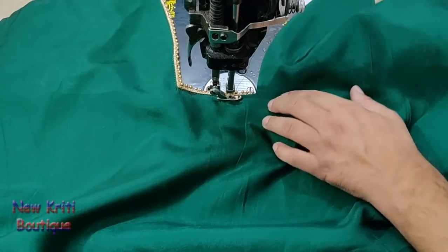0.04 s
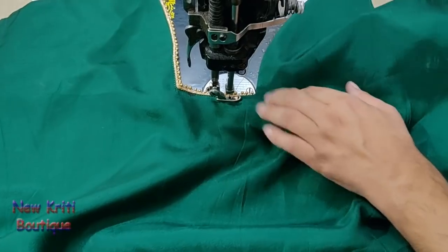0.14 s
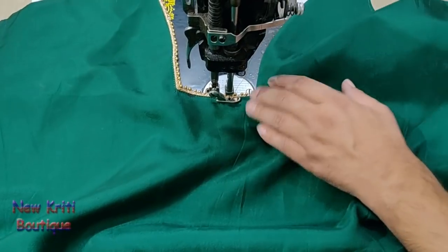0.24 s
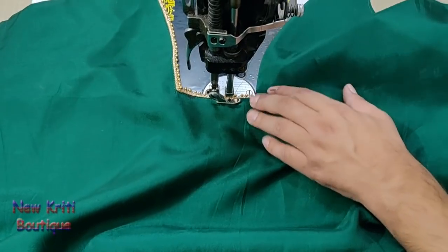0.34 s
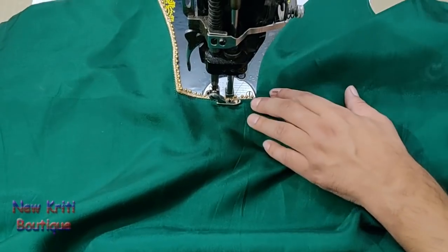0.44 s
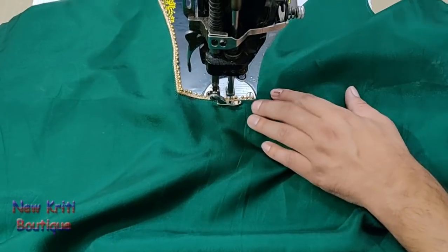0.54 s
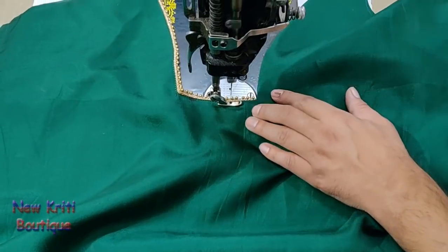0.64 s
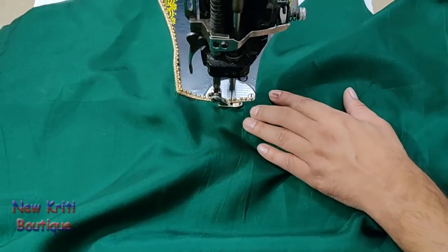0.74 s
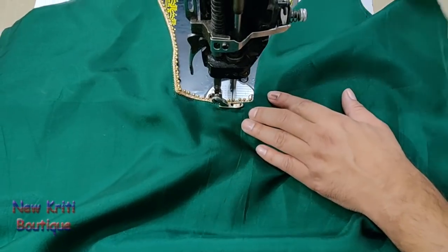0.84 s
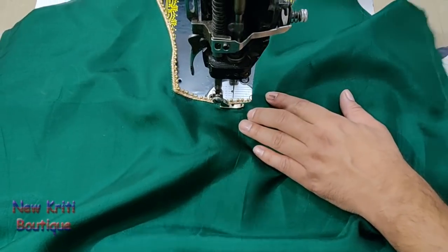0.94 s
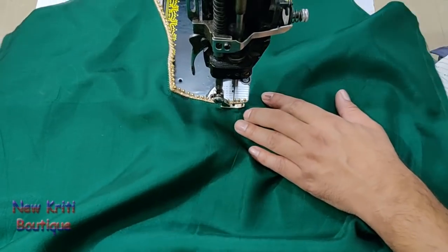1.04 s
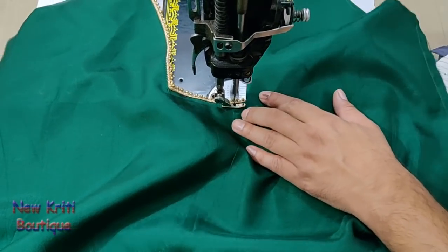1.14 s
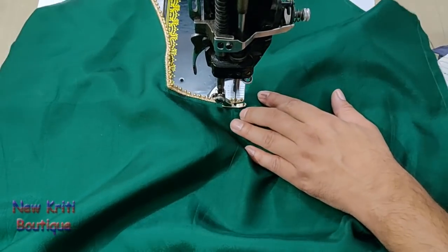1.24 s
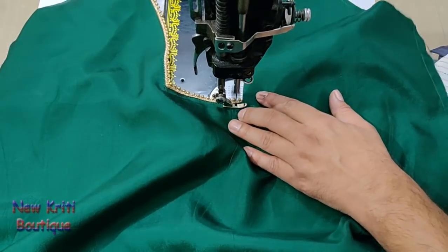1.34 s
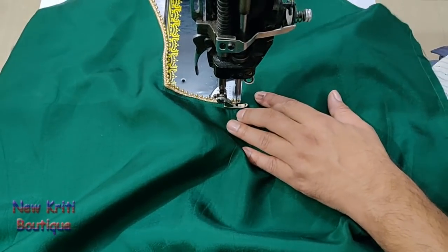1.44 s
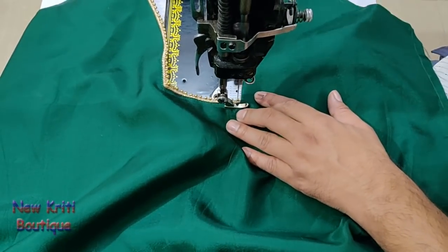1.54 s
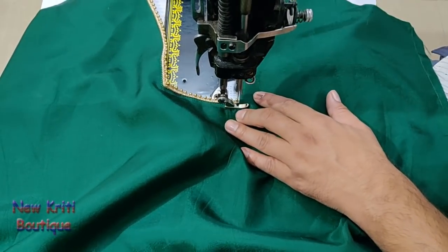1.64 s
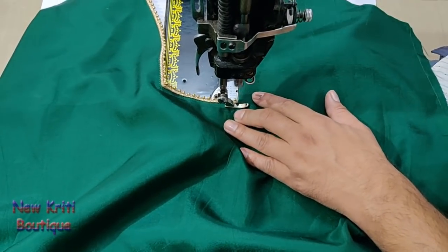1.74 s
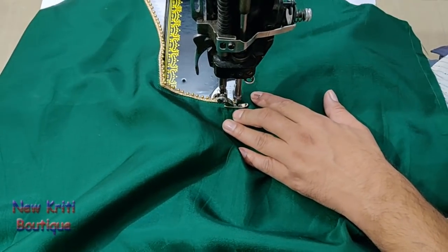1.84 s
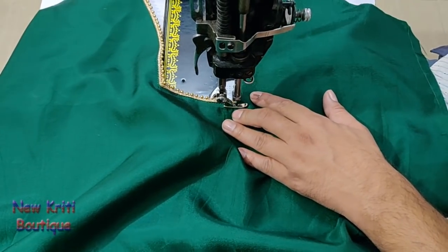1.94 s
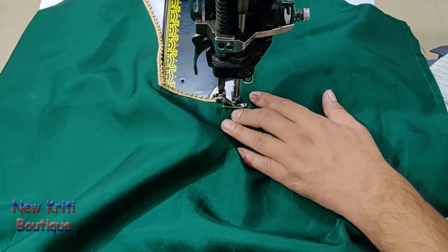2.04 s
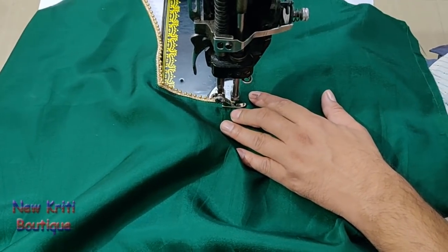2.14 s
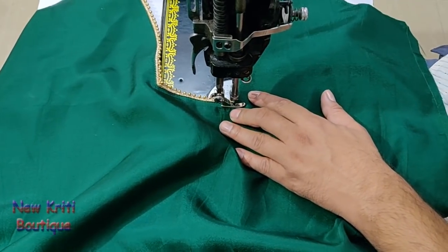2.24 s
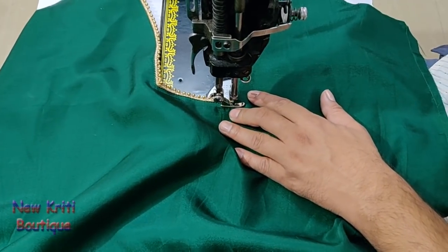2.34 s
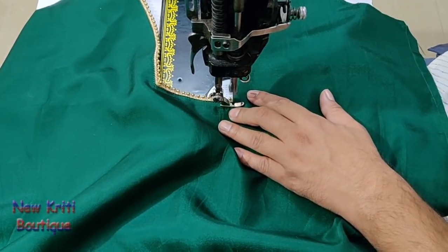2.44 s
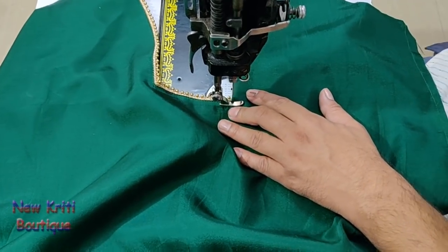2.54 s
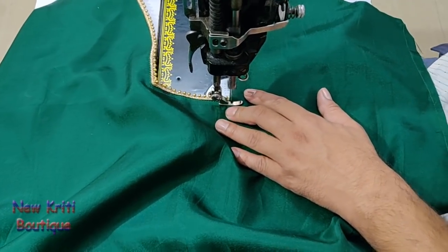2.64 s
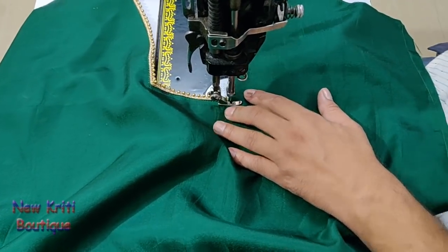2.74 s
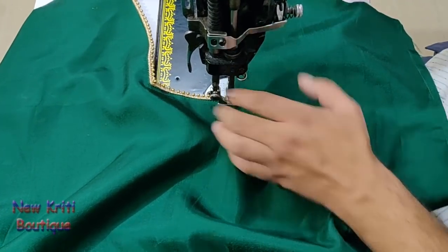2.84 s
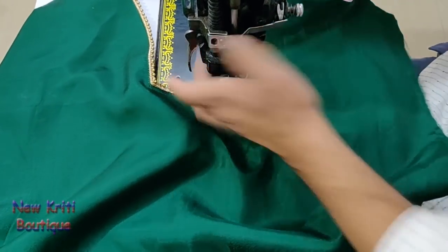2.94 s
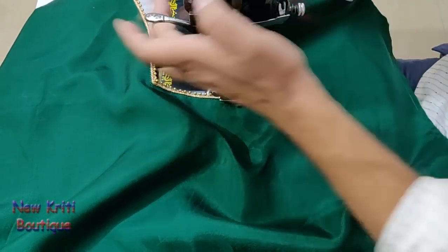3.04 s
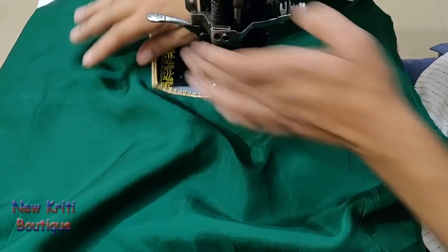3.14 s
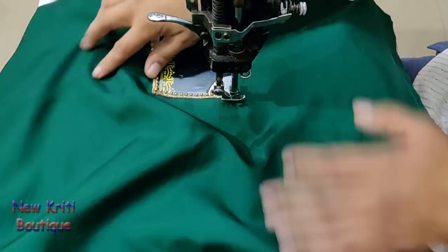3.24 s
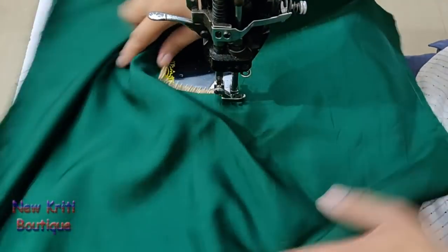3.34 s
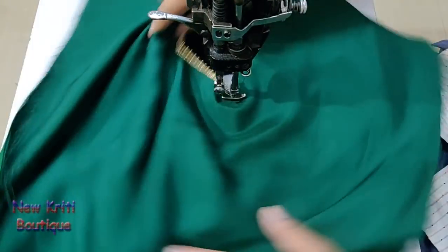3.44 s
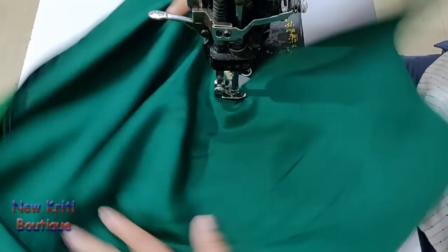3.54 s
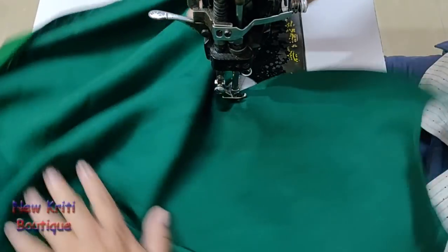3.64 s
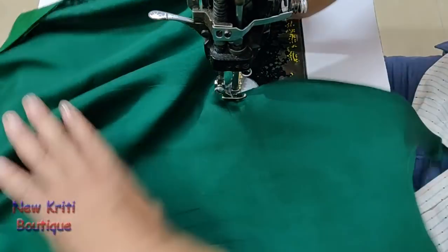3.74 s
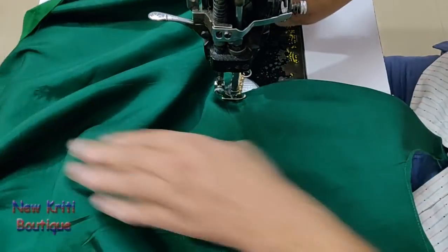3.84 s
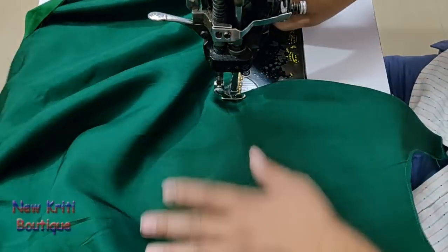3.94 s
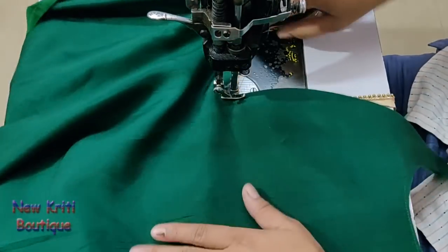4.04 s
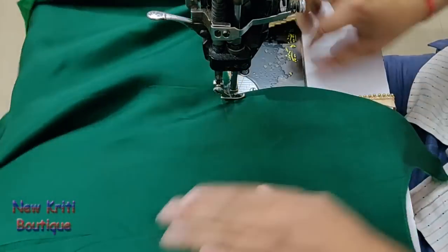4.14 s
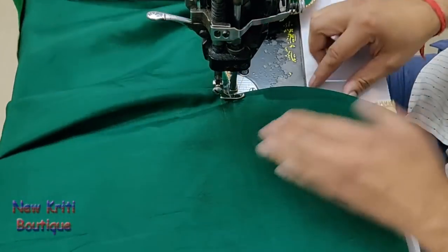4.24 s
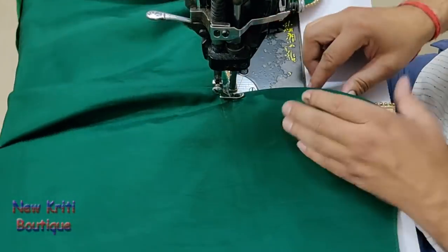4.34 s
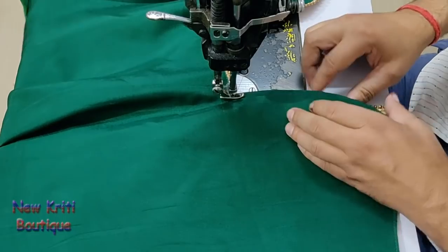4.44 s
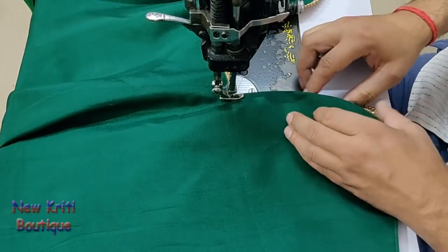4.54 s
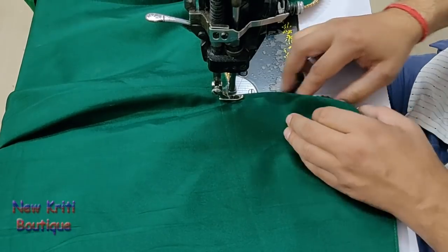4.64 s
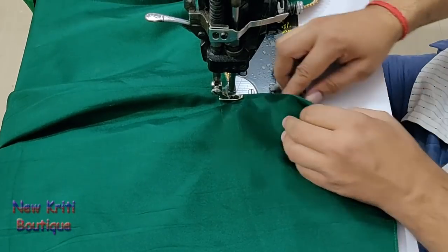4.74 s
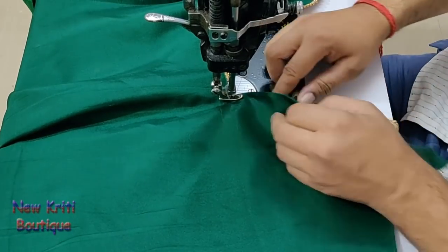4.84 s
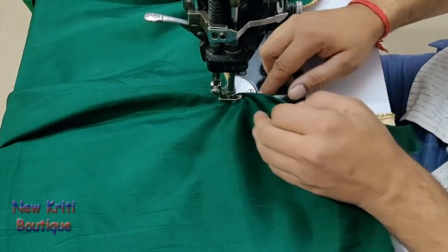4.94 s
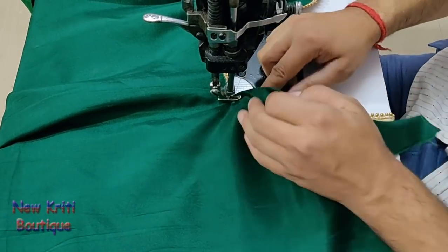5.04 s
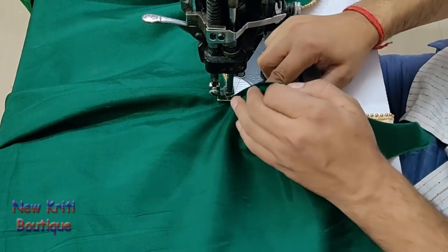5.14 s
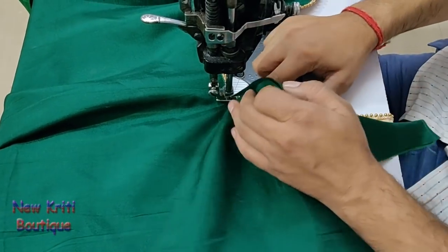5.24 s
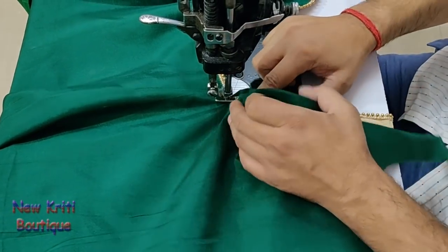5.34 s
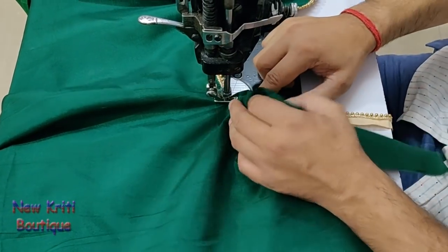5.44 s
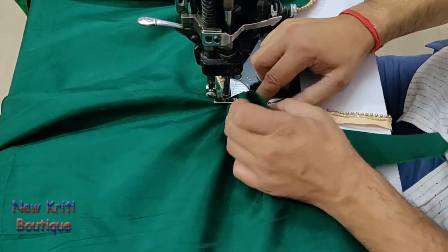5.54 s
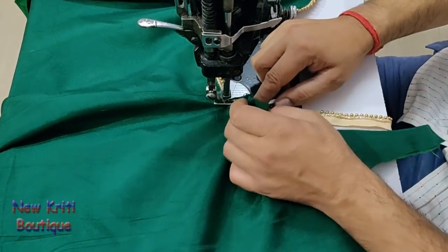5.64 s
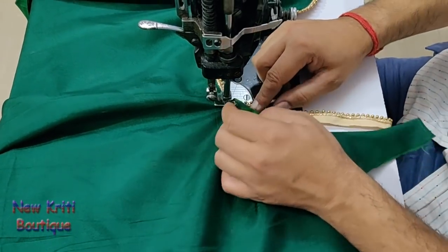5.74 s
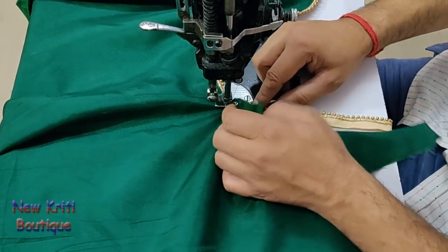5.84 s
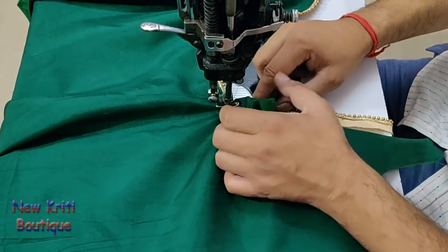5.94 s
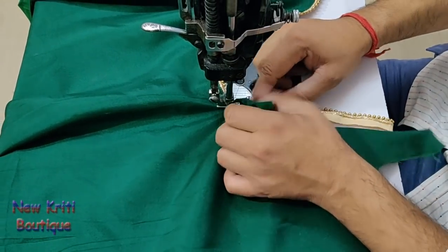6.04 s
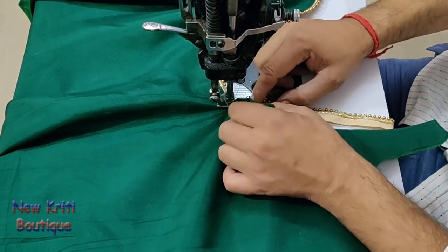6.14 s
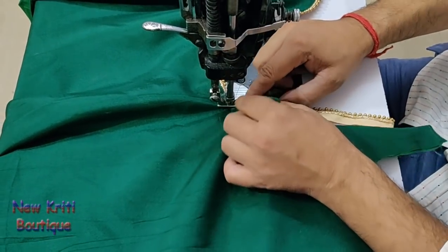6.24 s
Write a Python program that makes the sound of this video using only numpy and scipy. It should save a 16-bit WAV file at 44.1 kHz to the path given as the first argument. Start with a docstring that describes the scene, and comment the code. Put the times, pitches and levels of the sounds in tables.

```python
"""Over faint air a switch ticks and a cast-iron sewing machine starts up on a wooden table: gears hiss, a motor whines.
It sews a short run, coasts to a stop and is turned on a little by hand; the presser lever snaps up, hands knock the
table and drag the cloth round. Blows and ticks set modes of wood and iron ringing; hiss, cloth and air are shaped
noise; whine, squeaks and hums are narrow noise. A small room answers, heard by a close pair of microphones."""
import sys
import numpy as np
from scipy import signal
from scipy.fft import rfft, irfft, next_fast_len
from scipy.io import wavfile
from scipy.ndimage import uniform_filter1d

SR = 44100
rng = np.random.default_rng(int(sys.argv[2]) if len(sys.argv) > 2 else 0)


def to_wav(s):
    """Save 16-bit WAV."""
    ch = np.atleast_2d(s).T  # columns
    pcm = np.round(np.clip(ch, -1, 1) * 32767)  # PCM
    wavfile.write(sys.argv[1], SR, pcm.astype(np.int16))


N = 276991


def from_db(db):
    """Decibels to gain."""
    return 10 ** (np.asarray(db) / 20)


def rms_one(x):
    """Scale to rms 1."""
    return x / np.sqrt(np.mean(x ** 2) + 1e-20)


def in_time(rows):
    """Columns joined by straight lines; -120 outside the table."""
    seconds, *columns = np.transpose(rows)
    return [np.interp(np.arange(N) / SR, seconds, c, left=-120, right=-120) for c in columns]


def at_hz(points, hz, axis=1):
    """Read a column on a log-frequency axis."""
    points = np.array(points)
    return np.interp(np.log(hz), np.log(points[:, 0]), points[:, axis])


def swell(peak_s, rise_s, fall_s, db):
    """Gain that climbs 10 dB per rise time to its peak and sinks 10 dB per fall time."""
    t = np.arange(N) / SR - peak_s
    return from_db(db - 10 * np.maximum(-t / rise_s, t / fall_s))


def drift(rate_hz):
    """Slow random wander, rms about 1, made at a fortieth of the sample rate."""
    r = np.exp(-80 * np.pi * rate_hz / SR)
    noise = rng.standard_normal(N // 40 + 2002)
    slow = signal.lfilter([1], [1, -2 * r, r * r], noise)[2000:]
    return np.interp(np.arange(N) / 40, np.arange(len(slow)), rms_one(slow))


def coloured(x, gain):
    """Apply a gain given as a function of frequency."""
    size = next_fast_len(N + SR // 4)
    hz = np.maximum(np.fft.rfftfreq(size, 1 / SR), 10)
    return irfft(rfft(x, size) * gain(hz), size)[..., :N]


def spread_noise(spectrum, width, patchy_db):
    """Coloured stereo noise, narrow in the bass and wide in the treble, flickering a little; rms 1."""
    mid, side = coloured(rng.standard_normal((2, N)), lambda hz: from_db(at_hz(spectrum, hz)))
    side = coloured(side, lambda hz: from_db(at_hz(width, hz)))
    return rms_one((mid + side * [[1], [-1]]) * from_db(patchy_db * drift(8.4)))


def grains(per_s, spread_db):
    """Random little contacts of uneven size; rms 1."""
    spread = np.minimum(rng.exponential(1, N), 5)
    sizes = from_db(spread_db * spread) * rng.choice([-1, 1], N)
    return rms_one(sizes * (rng.random(N) < per_s / SR))


def ring(clicks, hz, t60):
    """A damped resonator: a unit click sets a sine of height 1 ringing."""
    r, w = from_db(-60 / (t60 * SR)), 2 * np.pi * hz / SR
    return signal.lfilter([0, np.sin(w)], [1, -2 * r * np.cos(w), r * r], clicks + 1e-18)


# Colour of the room and recorder noise. Each row: frequency in Hz, relative level in dB.
AIR_COLOUR = [(15, -53), (25, -7), (76, -6.5), (111, -1), (280, -6.5), (358, -9.5), (538, -12), (787, -20),
              (854, -15), (927, -20.5), (3320, -30), (15200, -31.5), (16500, -26.5)]
# Stereo width of air and rustle. Each row: frequency in Hz, side minus mid in dB.
FAR_SIDE = [(60, -7), (180, -7.5), (550, -2.5), (1650, 0.5), (4970, -0.5), (15000, 0)]
AIR_DB = -57


def air():
    """Room and recorder noise, a steady wide bed of coloured noise."""
    return from_db(AIR_DB) * spread_noise(AIR_COLOUR, FAR_SIDE, patchy_db=.8)


# The shaft turned by motor, then by hand: two lists. Each row: time in seconds, hiss of the gear in dB.
RUNNING = [
    [(.322, -47), (.335, -41.5), (.38, -42), (.43, -40), (.52, -38), (.64, -35.5), (.94, -34), (1.09, -37),
     (1.27, -40.5), (1.43, -43), (1.53, -43), (1.68, -57.5), (1.8, -84)],
    [(2.15, -83.5), (2.25, -61), (2.33, -52), (2.4, -56.5), (2.5, -59.5), (2.58, -70), (2.68, -89)],
]
FULL_HISS_DB = -37   # hiss at full speed


def shaft(db=FULL_HISS_DB, follows=1):
    """Gain tied to the turning shaft: db at full-speed hiss, then this many dB per dB of hiss."""
    return sum(from_db(db + follows * (in_time(part)[0] - FULL_HISS_DB)) for part in RUNNING)


# Single ticks of switch, handwheel, lever and pins, with a faint noisy swell just before the lever's clack.
# Each row: start in seconds, level in dB, balance of the mids in dB, balance of the top in dB.
TICKS = [(0.3169, -50, 13, -6), (0.3256, -34, -13, -24), (1.946, -61, 7, 10), (1.9585, -41.5, -9.5, -25),
         (2.1564, -50, -12, -21), (2.186, -46, -15, -10), (2.3135, -17.5, -17.5, -15),
         (2.3304, -19, -13, -10.5), (2.383, -24.5, -13, -15), (2.429, -49, 10, -21), (2.481, -47, 7, -22),
         (2.5059, -39, -17, -22), (2.533, -50, 2, -16), (2.79, -58.5, 19.5, 23), (2.8035, -6.5, -9, -5),
         (2.815, -23, -5, -6), (2.827, -21, -15, -9), (2.8371, -4, -11.5, -5), (2.849, -16.5, -7.5, -8),
         (2.864, -22, -8, -8.5), (2.882, -21, -3, -6), (3.021, -37, -60, -8), (3.7953, -36, 4, -28),
         (4, -39.5, -2.5, -26), (4.114, -23.5, -39, -1.5), (4.2137, -40, -11, 2), (4.37, -45.5, -33.5, 5),
         (4.6235, -39, -18, 1), (4.731, -42, -12, 1), (5.0015, -62, 1.5, -9), (5.038, -46.5, -16, -9.5)]
# Steel contacts of take-up, feed and hook as the shaft turns.
# Each row: start in seconds, level in dB, balance of the mids in dB, balance of the top in dB.
CLICKS = [(0.4464, -19, -16, -14), (0.4918, -22, -15, -16), (0.5457, -17.5, -16, -13),
          (0.5624, -17, -13, -16), (0.6245, -15, -17, -16), (0.6549, -14, -20, -14),
          (0.7133, -19.5, -14, -16), (0.7387, -15, -9, -18), (0.7692, -21, -9, -16),
          (0.7861, -17, -15, -16), (0.8101, -20, -11, -27), (0.8435, -20, -7, -18), (0.8584, -15, -18, -10),
          (0.8854, -38, -13, -14), (0.9218, -19, -13, -20), (0.9363, -16, -23, -13), (0.9652, -24, -8, -16),
          (1.0061, -17.5, -15, -16), (1.0231, -14, -17, -13), (1.0535, -16, -13, -16),
          (1.0715, -21, -13, -16), (1.0984, -20.5, -12, -16), (1.1199, -16, -27, -9),
          (1.1533, -15.5, -9, -13), (1.1744, -33, -13, -16), (1.2082, -19.5, -13, -14),
          (1.2326, -14.5, -13, -14), (1.2744, -29, -1, -16), (1.2979, -21.5, -15, -21),
          (1.3438, -16.5, -20, -12), (1.3658, -19.5, -14, -15), (1.4187, -19.5, -10.5, -11),
          (1.4451, -34, -9, -14), (1.5179, -17, -19, -13), (1.5529, -21.5, -5.5, -10),
          (1.6457, -23.5, -15.5, -12)]
TICK_PAN_DB, CLICK_PAN_DB = 1.5, 2     # left minus right
PLATE_DB, CLICK_RING_DB = -4, -28      # plates ring: against a tick's mids, fixed for a click


def all_ticks():
    """The contacts of the turning shaft, then the single ticks, each with its pan and ring level."""
    contacts = [(*row, CLICK_PAN_DB, CLICK_RING_DB) for row in CLICKS]
    singles = [(s, db, mids_db, top_db, TICK_PAN_DB, mids_db + PLATE_DB) for s, db, mids_db, top_db in TICKS]
    return np.transpose(contacts + singles)


# Iron arm and plates. Each row: mode in Hz, level in dB, 60 dB decay in seconds,
# dB more with a hand on the wheel, further dB once the lever is lifted.
IRON_MODES = [(1045, -16, 0.13, 9, -1.5), (1137, -21.5, .1, 5, 5.5), (1307, -20, 0.13, -4, 3),
              (1392, -15, 0.23, -2, 9), (1651, -17, 0.25, 3, -9), (1898, -21.5, 0.11, -1, 7),
              (1997, -13.5, 0.42, -11, -5), (2290, -21, .15, -5, 4), (6600, 0.5, 0.03, -4.5, 0)]
# Colour of the crack of a tick. Each row: frequency in Hz, relative level in dB.
CRACK_COLOUR = [(470, -28), (800, 7.5), (2070, 1), (3390, -3.5), (3660, 0), (4100, -4.5), (4480, 2.5),
                (5410, -3), (6710, 3.5), (11000, -21), (13600, -14), (15100, -12), (16500, -38)]
# Rattle of the lower iron modes, on the scale of their levels: dB at full speed, dB per dB of hiss.
IRON_SHAKE = (-28.5, 0.84)
CRACK_S, RATTLE_S, RATTLE_DB = 0.0018, 0.032, -24   # times to fall to a third; loose parts rattle under the crack
TOP_PAN_DB = -5.5           # added to the left-right lean above 9.5 kHz
TOP_RING_DB = -17           # the highest mode against the tick level, before its own level
HAND_ON_S, LIFTED_S = 2.1, 2.7
SHAKE_T60_S = 0.037         # parts in touch ring only briefly


def iron():
    """Each tick is a brief broad crack with a rattle, its noise different at each microphone, and a faint ring."""
    s, level_db, mids_db, top_db, pan_db, ring_db = all_ticks()
    at, cracked = (s * SR).astype(int), np.zeros((2, N))
    t = np.arange(3000) / SR
    crack = (1 - np.exp(-t / 0.001)) * np.exp(-t / CRACK_S)
    rattle = from_db(RATTLE_DB) * np.exp(-t / RATTLE_S)
    puffs = rng.standard_normal((len(at), 2, len(t))) * (crack + rattle)
    splits = [(3000, "low", mids_db + 10.5, 0),
              ([3000, 9500], "band", 0, 0),
              (9500, "high", top_db + 14.5, TOP_PAN_DB)]
    for edge_hz, kind, balance_db, lean_db in splits:
        band = np.zeros((2, N))
        gain = from_db(level_db + balance_db + (pan_db + lean_db) * [[.5], [-.5]])
        for i, start in enumerate(at):
            band[:, start:start + len(t)] += gain[:, [i]] * puffs[i]
        cracked += signal.sosfilt(signal.butter(3, edge_hz, kind, fs=SR, output="sos"), band + 1e-18)
    cracked = coloured(cracked, lambda hz: from_db(at_hz(CRACK_COLOUR, hz) + 5))

    rings, luck_db = 0, rng.normal(0, 2.5, (len(at), len(IRON_MODES)))
    shaken = shaft(*IRON_SHAKE)
    for k, (hz, mode_db, t60, held_db, lifted_db) in enumerate(IRON_MODES):
        lower = hz < 3000
        if lower:   # the turning shaft keeps these rattling
            cracked += from_db(mode_db) * shaken * rms_one(ring(grains(250, 5.3), hz, SHAKE_T60_S))
        strike_db = level_db + (ring_db if lower else TOP_RING_DB) + mode_db + luck_db[:, k]
        strike_db = strike_db + held_db * (s > HAND_ON_S) + lifted_db * (s > LIFTED_S)
        clicks = np.zeros(N)
        clicks[at] += from_db(strike_db)
        rings = rings + ring(clicks, hz, t60)
    return cracked, rings


def narrow_hiss(hz, gain, orders, width_hz):
    """Narrow bands of noise on multiples of a pitch curve: slow noise on a sine and a cosine."""
    turns = np.cumsum(hz) / SR
    tone = 0
    for multiple, db in orders:
        angle = 2 * np.pi * multiple * turns
        wander_hz = multiple * width_hz
        tone = tone + from_db(db) * (drift(wander_hz) * np.sin(angle) + drift(wander_hz) * np.cos(angle))
    return gain * tone


# Short rubs, squeaks and one low hum. Each row: peak in seconds, rise in seconds, fall in seconds,
# level in dB, pitch in Hz, glide in Hz per second, width in Hz.
SQUEAKS = [(.319, 0.0026, 0.0053, -40, 1915, 4, 150), (2.482, 0.007, 0.012, -53.5, 2145, 1.5, 100),
           (3.68, 0.086, 0.12, -53, 125.5, -2, 4.1), (4.069, 0.05, 0.14, -53, 2230, 120.5, 90),
           (4.118, 0.29, 0.056, -52.5, 801, 99.5, 36), (4.51, 0.023, 0.03, -66, 2470, -4, 19),
           (4.765, 0.038, 0.018, -61, 1745, 3, 140), (5.14, .05, 0.071, -69.5, 1640, -0.5, 31),
           (5.5, 0.055, 0.036, -67, 2630, 3.5, 79)]
# Hums in the table once the motor is on. Each row: peak in seconds, rise in seconds, fall in seconds,
# level in dB, pitch in Hz, glide in Hz per second, width in Hz.
HUMS = [(.64, 0.15, 0.13, -29.5, 437.4, -4.5, 13.5), (1.13, 0.18, 0.063, -26.5, 432, 251.5, 12)]


def squeaks(rows):
    """Each narrow hiss swells and sinks on its own gliding pitch."""
    t = np.arange(N) / SR
    return sum(narrow_hiss(hz + glide * (t - s), swell(s, rise, fall, db), [(1, 0)], width_hz)
               for s, rise, fall, db, hz, glide, width_hz in rows)


# Colour of the running gear. Each row: frequency in Hz, relative level in dB.
GEAR_COLOUR = [(1530, -19.5), (2600, -7.5), (5300, -10.5), (6730, -7), (7380, -12), (10300, -19.5),
               (11200, -26), (15000, -16), (16000, -25), (16500, -53)]
# Stereo width of the machine's sound. Each row: frequency in Hz, side minus mid in dB.
NEAR_SIDE = [(60, -35), (150, -35), (380, -24.5), (950, -3.5), (2380, -1), (5980, 1), (15000, -1.5)]


def gear():
    """Bearings, belt and thread hiss in a gritty stream while the shaft turns."""
    grit = 1 + 0.2 * uniform_filter1d(np.abs(grains(300, 8.3)), size=40)
    return shaft() * grit * spread_noise(GEAR_COLOUR, NEAR_SIDE, patchy_db=2)


# Swell of the motor whine: peak in seconds, rise in seconds, fall in seconds, level in dB.
WHINE_SWELL = (.61, .4, .06, -37.5)
# Partials of the whine. Each row: multiple of the pitch, level in dB.
WHINE_ORDERS = [(1, -6), (2, -3), (3, -11), (4, -14), (6, -11)]
MOTOR_ON_S, TOP_HZ, START_HZ, SPIN_UP_S = .33, 1575, 475, .185   # the pitch closes in on its top
WHINE_WIDTH_HZ = 45   # times the multiple


def whine():
    """The motor's whine: blurred partials whose pitch climbs ever more slowly to the top."""
    t = np.arange(N) / SR
    motor_hz = TOP_HZ - (TOP_HZ - START_HZ) * np.exp(-np.maximum(t - MOTOR_ON_S, 0) / SPIN_UP_S)
    return narrow_hiss(motor_hz, swell(*WHINE_SWELL) * (t > MOTOR_ON_S), WHINE_ORDERS, WHINE_WIDTH_HZ)


# One row a stitch, timed as the needle bar bottoms out.
# Each row: time in seconds, blow into the table in dB, deep boom in dB.
STITCHES = [(0.434, -51, -80), (0.5311, -21, -31.5), (0.6416, -11.5, -31), (0.726, -10.5, -29),
            (0.7977, -10, -28), (0.8716, -12.5, -27), (0.9517, -13, -35), (1.0393, -12, -35),
            (1.1369, -10, -29), (1.2578, -11, -25.5), (1.4003, -13, -28.5), (1.6192, -30.5, -48)]


def beat(depth_db, share):
    """Gain that swells once a stitch, highest at this share of the turn."""
    turn = np.interp(np.arange(N) / SR, [row[0] for row in STITCHES], np.arange(len(STITCHES)))
    return from_db(depth_db * np.cos(2 * np.pi * (turn - share)))


# The motor taking hold kicks the low note: peak in seconds, rise in seconds, fall in seconds, level in dB.
JOLT = (.355, .012, .08, -23)
# Layers tied to the shaft: rumble into the table, then scrape of the feed.
# Each row: dB at full speed, dB per dB of hiss.
RUMBLE_FOLLOWS, SCRAPE_FOLLOWS = [(-26.5, 0.92), (-36.5, 1)]
THROB_HZ, THROB_DB, THROB_SHARE = 180.1, -19.5, 0.13   # level on top of the rumble's gain
THROB_DEPTH_DB = 16.5   # up and down


def throb():
    """One low note: kicked by the jolt, then a sine swelling and sinking with each turn."""
    turning = from_db(THROB_DB) * beat(THROB_DEPTH_DB, THROB_SHARE) * shaft(*RUMBLE_FOLLOWS)
    return (swell(*JOLT) + turning) * np.sin(2 * np.pi * THROB_HZ * np.arange(N) / SR)


# Dull blows into the table from handwheel, lever and hands.
# Each row: start in seconds, level in dB, deep boom in dB, hardness in dB, low notes in dB.
THUDS = [(1.947, -40.5, -65, -14, -8), (2.213, -54, -74, -8, -5), (2.248, -51, -78, -3, -11),
         (2.291, -28, -76, -5, -15), (2.313, -30.5, -70, -16, -11), (2.343, -30, -77, -4, -12),
         (2.428, -30.5, -70, -6, -14), (2.461, -44, -68, 7, -6), (2.485, -24.5, -50.5, -22, -3),
         (2.507, -23.5, -60, -17, -5), (2.792, -35.5, -28, -4, 0), (2.804, -9.5, -43, -11, -5.5),
         (2.822, -17, -73, -10, -11), (2.839, -8, -51, -15, 3), (2.862, -13.5, -66, -18, -3),
         (3.005, -56, -42, -23, -2), (3.037, -69, -45, -25, 1), (3.159, -21, -70, -13, -4),
         (3.199, -30, -53, -23, 5), (3.694, -44, -67, -13, -1), (3.784, -54, -43.5, -2, 3),
         (3.793, -21.5, -43, -7, -3), (3.932, -52, -65, 6, 1), (3.999, -25, -47.5, -4, -1.5),
         (4.116, -55, -66, 7, -10), (4.238, -38.5, -54, -25, 8), (4.29, -49.5, -65, -25, 6),
         (4.41, -46.5, -76, -25, 8), (5.001, -45.5, -75, 0, -3.5), (6.033, -58, -65, 3.5, 1),
         (6.238, -44, -56, -15, 9)]
BLOW_HARD_DB, BLOW_LOW_DB = -27, 6.5   # hardness and low notes of a stitch blow
REBOUND_S, REBOUND_DB, REBOUND_HARD_DB = 0.0085, -5, -4.5   # a harder knock follows each stitch blow


def all_thuds():
    """The blow of each stitch and its rebound, then the single blows."""
    blows = [(s, db, boom_db, BLOW_HARD_DB, BLOW_LOW_DB) for s, db, boom_db in STITCHES]
    rebounds = [(s + REBOUND_S, db + REBOUND_DB, -120, REBOUND_HARD_DB, 0) for s, db, _ in STITCHES]
    return np.transpose(blows + rebounds + THUDS)


# Wooden table top. Each row: mode in Hz, level in dB, 60 dB decay in seconds.
TABLE_MODES = [(88.3, 2, 0.25), (123.7, -8.5, 0.88), (184.3, -5.5, 0.47), (234.4, -2, 0.094),
               (297.8, 0.5, 0.21), (346, -2.5, 0.15), (385.6, -5.5, 0.3), (428.2, -0.5, 0.11),
               (511, -6.5, 0.17), (562, -7.5, 0.34), (634, -3, 0.059), (695, -4.5, 0.027),
               (900, -14, 0.089), (1077, -7.5, 0.026)]
# Hands and cloth shake the table. Each row: time in seconds, level in dB.
HANDLING = [(2.95, -46), (3.01, -46.5), (3.1, -51.5), (3.28, -60.5), (3.51, -58.5), (3.81, -67),
            (3.98, -50), (4.13, -47), (4.25, -57.5), (4.89, -63), (5.26, -64), (5.8, -73.5), (6.28, -70)]
JOLT_RUMBLE_DB = -9   # the jolt shakes the whole top this much less than the low note


def table():
    """A blow strikes all modes almost at once through a soft contact; shaft and hands shake the top steadily."""
    s, level_db, boom_db, hard_db, low_db = all_thuds()
    at, shape = (s * SR).astype(int), (len(s), len(TABLE_MODES))
    luck_db = rng.normal(0, 3.76, shape)
    late = (rng.random(shape) * 0.0013 * SR).astype(int)   # the modes do not start quite together
    booms, blows, shaking = 0, 0, 0
    for k, (hz, mode_db, t60) in enumerate(TABLE_MODES):
        clicks = np.zeros(N)
        if hz < 140:   # only blows reach the deepest modes
            clicks[at] = from_db(boom_db + mode_db + 2.5 + luck_db[:, k])
            booms = booms - ring(clicks, hz, t60)
        else:
            balance_db = (hard_db + 12) * (hz > 600) + low_db * (hz < 260) - 12
            clicks[at + late[:, k]] = from_db(level_db + balance_db + mode_db + luck_db[:, k])
            blows = blows + ring(clicks, hz, t60)
            shaking = shaking + from_db(mode_db) * ring(grains(500, 2.87), hz, t60 * 0.41)
    booms = signal.sosfilt(signal.butter(3, [66, 140], "band", fs=SR, output="sos"), booms)
    blows = signal.sosfilt(signal.butter(2, [170, 900], "band", fs=SR, output="sos"), blows)
    jolt = from_db(JOLT_RUMBLE_DB) * swell(*JOLT)
    rumble = shaft(*RUMBLE_FOLLOWS) + jolt + from_db(in_time(HANDLING)[0])
    flicker = from_db(2 * drift(28))
    return booms + from_db(1.5) * blows + rumble * flicker * rms_one(shaking)


# Strokes of cloth over the bed, the noisy tail after the lever, and short bursts with the knocks.
# Each row: peak in seconds, rise in seconds, fall in seconds, bright rustle in dB, scrape in dB.
STROKES = [(2.95, 0.022, 0.072, -68, -46), (3.24, 0.32, 0.4, -53.5, -52.5),
           (3.792, 0.0042, 0.037, -50, -36), (3.98, 0.13, 0.27, -59, -51.5),
           (4.12, 0.016, 0.062, -54, -52.5), (4.53, 0.073, 0.059, -52, -55.5),
           (4.63, 0.0041, 0.068, -57, -63), (4.76, 0.019, 0.03, -52.5, -57),
           (5.18, 0.087, 0.13, -64, -58.5), (5.54, 0.13, 0.087, -65.5, -57.5),
           (6.039, 0.017, 0.072, -68.5, -59.5), (6.239, 0.022, 0.14, -65.5, -61)]
# Colour of the scrape. Each row: frequency in Hz, relative level in dB.
SCRAPE_COLOUR = [(440, 5.5), (750, 3), (1220, 1), (1350, -3.5), (1510, -3), (2010, -4), (2700, -9.5),
                 (3510, -48), (5940, -120)]
# Colour of the rustle. Each row: frequency in Hz, relative level in dB.
RUSTLE_COLOUR = [(1530, -28), (2600, -1), (4720, -2.5), (6940, 0), (9910, -9.5), (15000, -4), (16100, -18),
                 (16500, -42.5)]


def cloth():
    """Feed and hands scrape and rustle the cloth; the lever's tail and knock bursts share these two noises."""
    rustle = sum(swell(s, rise, fall, db) for s, rise, fall, db, _ in STROKES)
    strokes = sum(swell(s, rise, fall, db) for s, rise, fall, _, db in STROKES)
    scrape = shaft(*SCRAPE_FOLLOWS) + strokes
    scraping = scrape * spread_noise(SCRAPE_COLOUR, NEAR_SIDE, patchy_db=1)
    return scraping + rustle * spread_noise(RUSTLE_COLOUR, FAR_SIDE, patchy_db=2.5)


def bands():
    """Half-octave band-passes with their centres."""
    edges = 25 * 2 ** np.arange(0, 9.6, .5)
    for low, high in zip(edges, edges[1:]):
        yield np.sqrt(low * high), signal.butter(2, [low, high], "band", fs=SR, output="sos")


def widen(mid, side, side_db):
    """Left and right from two unrelated sounds, keeping the power."""
    g = from_db(side_db)
    return (mid + g * side * [[1], [-1]]) * np.sqrt(2 / (1 + g * g))


# The small room. Each row: frequency in Hz, 60 dB decay in seconds, relative level in dB.
ROOM = [(102, 1, -27), (416, 0.38, -0.5), (1510, 0.25, 4), (4950, 0.24, 2.5), (15400, 0.22, -2)]
ROOM_DB = 3


def room(x):
    """Noise that dies band by band answers each sound, differently at each microphone."""
    t = np.arange(int(.6 * SR)) / SR
    mid, side = rng.standard_normal((2, len(t))) * np.clip(t / 0.0026, 0, 1)
    tail = 0
    for hz, sos in bands():
        t60 = at_hz(ROOM, hz)
        pair = from_db(at_hz(ROOM, hz, axis=2)) * widen(mid, side, at_hz(NEAR_SIDE, hz) + 4)
        tail = tail + signal.sosfilt(sos, pair) * from_db(-60 * t / t60) / np.sqrt(t60 * SR / 7)
    answer = rfft(tail, 2 * len(t))   # a dense room favours no single note
    power = np.abs(answer) ** 2
    even = np.sqrt(uniform_filter1d(power, size=150) / (uniform_filter1d(power, size=14) + 1e-20))
    tail = irfft(answer * even)[:, :len(t)]
    return signal.fftconvolve(x[None], tail, axes=1)[:, :N]


def scene():
    """Machine and table sound in the room; hiss, cloth and air are already spread."""
    hums = squeaks(HUMS) * (np.arange(N) / SR > MOTOR_ON_S)
    cracks, rings = iron()   # the thin rings are added dry, without the room
    machine = cracks + squeaks(SQUEAKS) + whine() + throb() + table() + hums
    answer = from_db(ROOM_DB) * room(machine[0])   # the left channel feeds the room
    return air() + machine + rings + answer + gear() + cloth()


# Balance of the microphone pair. Each row: frequency in Hz, left minus right in dB.
TILT = [(300, -0.5), (1400, 2), (2800, -1.5), (5600, 3.5), (9000, -1), (14000, 0)]
CUTOFF_HZ = 16800


def record(dry):
    """The two microphones colour the sound differently; peaks are rounded, deep bass and the top cut."""
    heard = coloured(dry, lambda hz: from_db(at_hz(TILT, hz) * [[.5], [-.5]]))
    heard = signal.sosfilt(signal.butter(1, 50, "high", fs=SR, output="sos"), heard)
    heard = .82 * np.tanh(heard / .82)
    return signal.sosfilt(signal.cheby2(18, 70, CUTOFF_HZ, fs=SR, output="sos"), heard)


dry = scene()
out = record(dry)
to_wav(out)
```